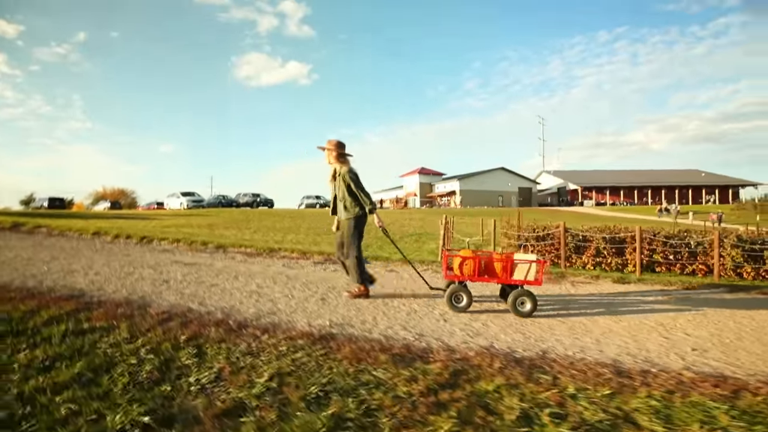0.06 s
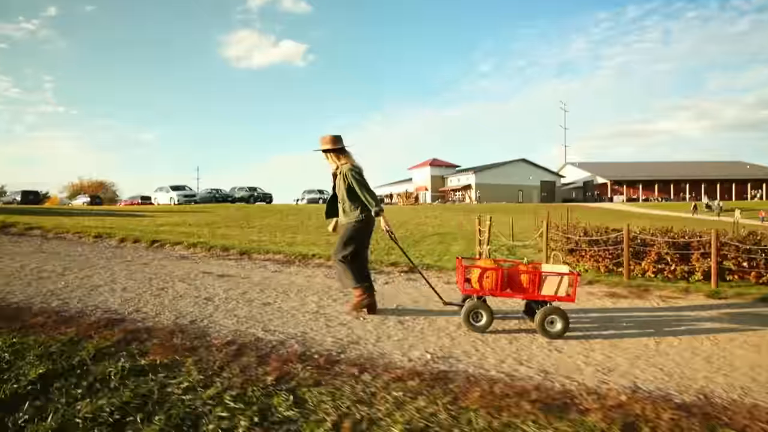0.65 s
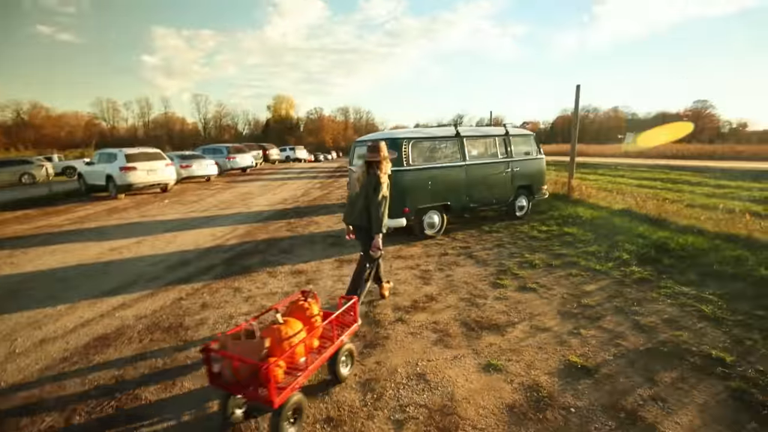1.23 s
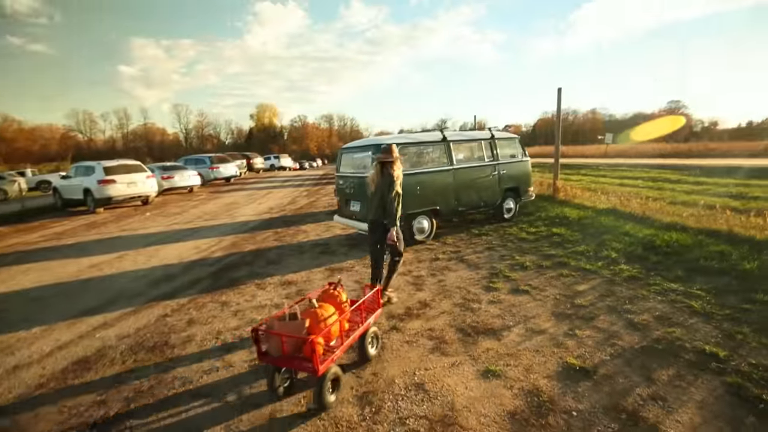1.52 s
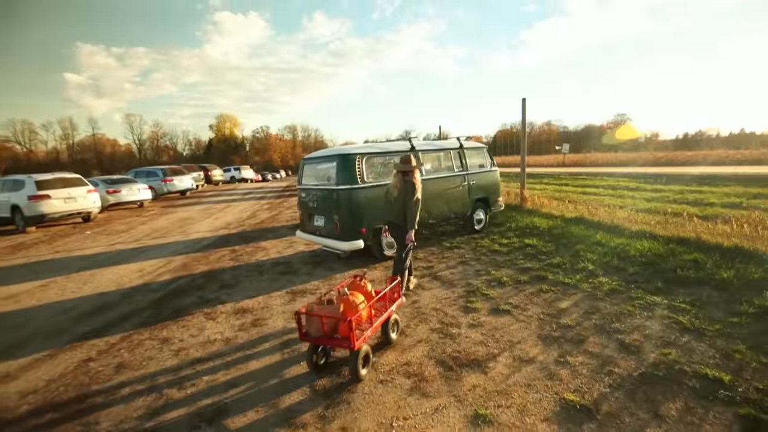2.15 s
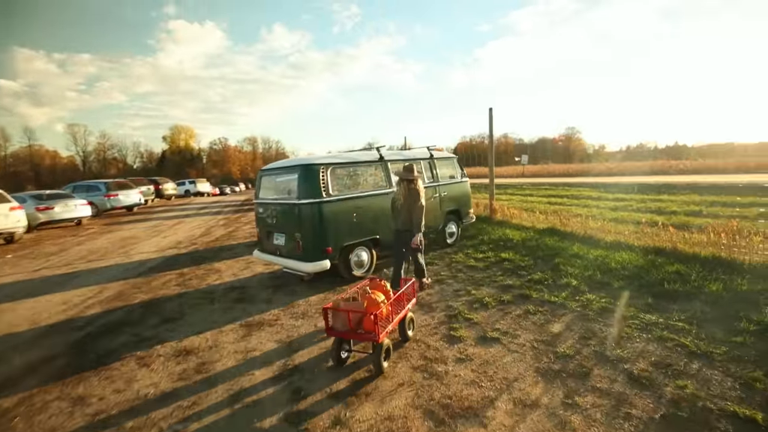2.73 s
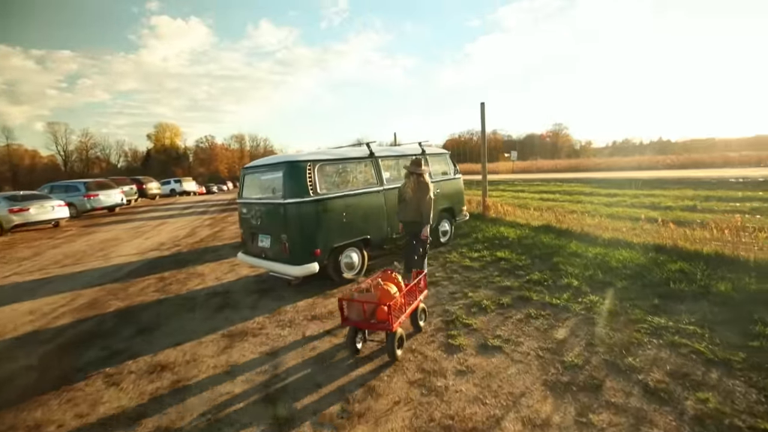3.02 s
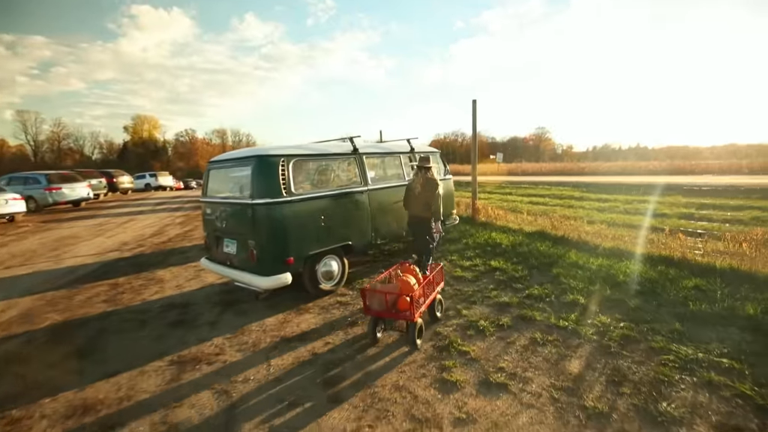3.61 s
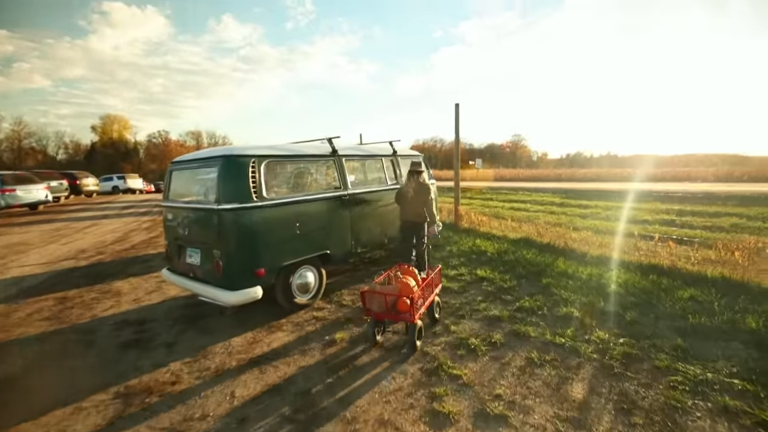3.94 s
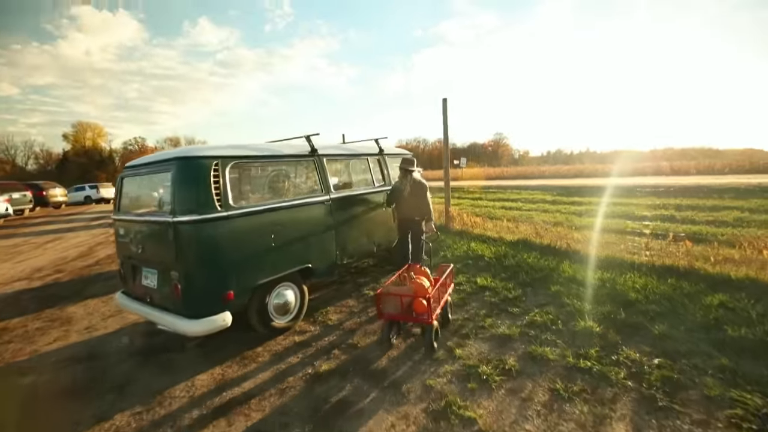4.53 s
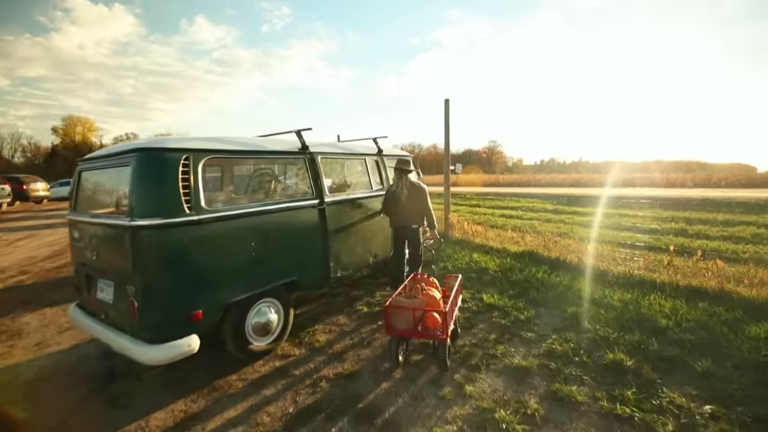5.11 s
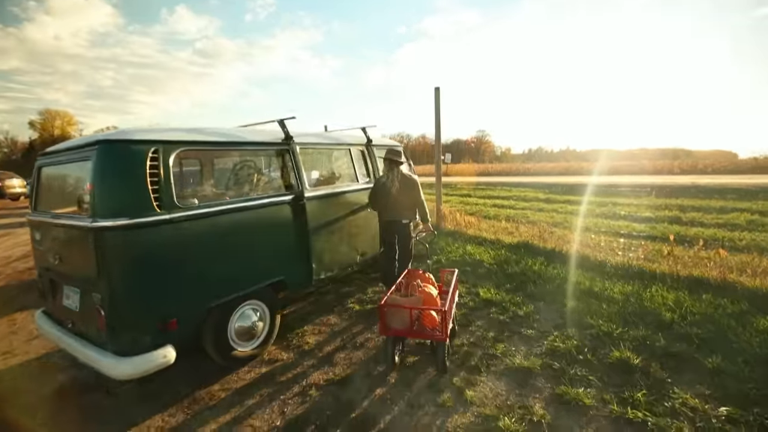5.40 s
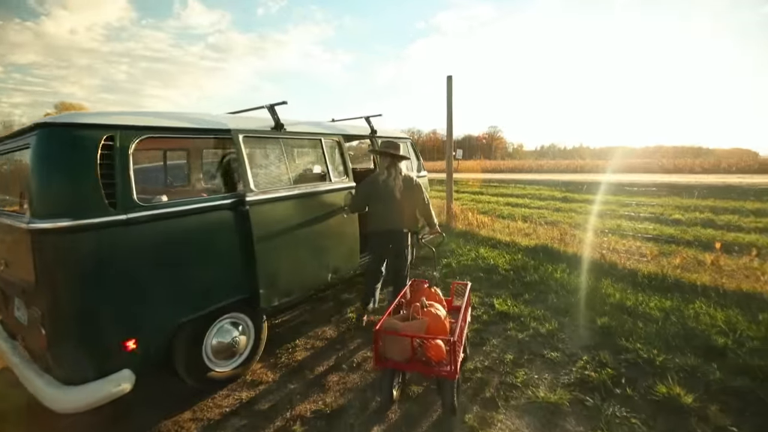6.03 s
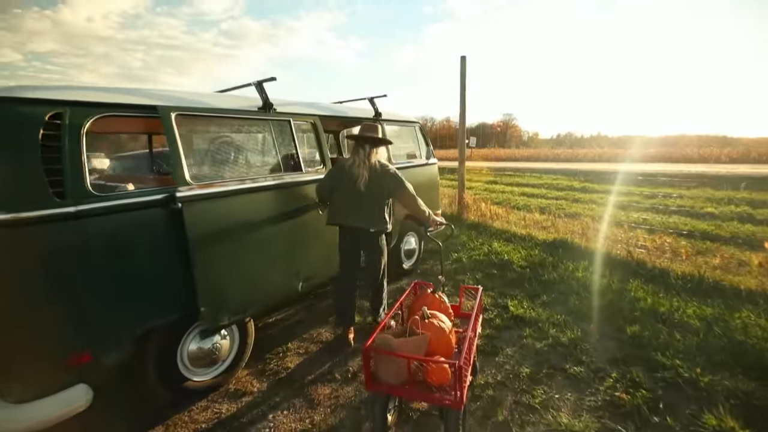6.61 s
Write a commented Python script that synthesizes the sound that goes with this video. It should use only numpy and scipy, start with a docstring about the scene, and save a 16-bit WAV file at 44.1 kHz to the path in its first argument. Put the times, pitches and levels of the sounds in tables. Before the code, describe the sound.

Gravel crunches and scuffs as a metal wagon rolls along, its mesh sides rattling brightly and its axle giving tiny squeaks. Once the wagon comes to rest, a van's door latch clicks sharply with a thud, and the sliding door rolls open with a hollow, juddering rumble. The setting is quiet open air, with a faint low hum at first and soft puffs of wind on the microphone.

```python
"""Stones crunch and pop under the tyres of a loaded steel-mesh wagon pulled over gravel outdoors.
Bumps set its cage clashing and jiggling, the steel squeaks and clinks, and the gravel is scuffed.
It rolls to a stop; a van's latch snaps and the side door rumbles down its rail, the rollers
shaking the hollow body. Underneath lie an open-air hush, a light breeze nudging the microphone
and, at the start, a faint low hum."""
import sys
import numpy as np
from scipy import signal
from scipy.fft import rfft, irfft, next_fast_len
from scipy.io import wavfile
from scipy.ndimage import map_coordinates

SR = 44100
rng = np.random.default_rng(int(sys.argv[2]) if len(sys.argv) > 2 else 0)


def persist_wave(psi):
    """Save psi, clipped to +-1, as 16-bit WAV."""
    counts = np.round(np.clip(psi, -1, 1) * 32767).astype(np.int16)
    wavfile.write(sys.argv[1], SR, np.atleast_2d(counts).T)


N = 297675
TOP_HZ = 16000

# bumps that throw the wagon's panels: start_s, level_db, edge_offset_db, rebound_offset_db
BUMPS = [(.05, -42.5, -7, -4), (.067, -41, 0, -7), (0.1467, -45.5, 7, -17), (.477, -38.5, -8, -20),
         (0.5533, -38, 2.5, 1), (0.6531, -32, 0.5, -2.5), (0.7514, -34, -16, -9), (0.8036, -33, -17, -8),
         (0.887, -40.5, -13, 5.5), (1.05, -35, -10, 0), (1.072, -35, -21, -15), (1.116, -33, -21, -30),
         (1.179, -26, -3, -4.5), (1.229, -25, -4, -35), (1.3058, -22.5, -5, -35), (1.406, -32, -13, -22),
         (1.4404, -29.5, -14, -5), (1.4872, -30, -26, -17), (1.758, -30, -24, -14),
         (1.801, -31.5, -17, -10), (1.904, -31, -1.5, -11), (1.949, -38, -12, -12), (2.0105, -29, -3.5, -5),
         (2.072, -40.5, 0, -22), (2.162, -37.5, -18, 6), (2.181, -41, -16, -12), (2.247, -43, 0, -20),
         (2.32, -32.5, -6.5, -1), (2.451, -29.5, -6, -2), (2.476, -31.5, -3, -15), (2.5117, -23, 1.5, -4.5),
         (2.6037, -35, -9, -25), (2.666, -30, -12, -16), (2.683, -24, 0.5, -35), (2.8061, -33, -15, -17),
         (2.843, -26, -3, -4), (2.904, -29, -5.5, -16), (2.942, -36.5, -21, -24), (2.984, -41.5, -24, -23),
         (3.174, -31.5, -14, -1.5), (3.3456, -22, -1.5, -33), (3.428, -33, -23, -23),
         (3.447, -32.5, -3, -19), (3.489, -29.5, -15, -6), (3.5378, -27, -15, -27),
         (3.6437, -39.5, -23, -20), (3.686, -34.5, -21, -8.5), (3.793, -39.5, -24, -12),
         (3.835, -44, -22, -1), (3.933, -38.5, -3, -22), (3.9483, -33.5, -7, -27), (4.04, -39, -27, -24),
         (4.137, -54, -20, -17), (4.1603, -42.5, -1, -33), (4.2167, -39.5, -8, -22), (4.527, -48, -19, -18)]
# tone of the clash and jiggle as heard, with a treble cut near 10 kHz: freq_hz, gain_db
CLASH_TONE = [(400, -28.5), (1500, -7.5), (2200, -3.5), (2700, 2.5), (3800, 3.5), (6000, 1.5), (8000, -1.5),
              (9400, 1), (10200, -15.5), (15800, -15.5)]
# resonances of the cage: pitch_hz, width_hz, boost_db
CAGE_MODES = [(2700, 340, 2.5), (4720, 40, -5), (5920, 140, -2.5), (6850, 75, -21), (7370, 99, 3.5),
              (7610, 140, 1.5), (8020, 640, 0.5), (8700, 220, -6), (13867, 120, -2), (14650, 80, -10)]
# broad tone of the door panel, shaken by its rollers: freq_hz, gain_db
PANEL_TONE = [(25, -32), (50, -14), (75, -18.5), (150, -11), (260, -3.5), (420, 2), (700, 0), (930, -4.5),
              (1300, -11), (2500, -28.5), (6000, -55)]
# resonances of the hollow van: pitch_hz, width_hz, boost_db
VAN_MODES = [(240.4, 7.1, 2), (293, 20, -3), (384, 5.7, 0), (481, 10, -9.5), (597, 16, -3), (687, 14, -2),
             (910, 31, -5.5)]


def amp(db):
    """Decibels to amplitude."""
    return 10 ** (np.asarray(db) / 20)


def unit(x):
    """Scale to rms 1."""
    return x / np.sqrt(np.mean(x ** 2) + 1e-20)


def curve(points):
    """Join (time_s, value) points into one value per sample."""
    return np.interp(np.arange(N) / SR, *np.transpose(points))


def swell(s, width):
    """A smooth rise and fall around s seconds, peak 1."""
    return np.exp(-((np.arange(N) / SR - s) / width) ** 2)


def wobble(rate):
    """A smooth random curve, rate knots a second."""
    knots = rng.standard_normal(int(N * rate / SR) + 4)
    return map_coordinates(knots, [np.arange(N) * rate / SR])


def add(track, s, sound):
    """Mix a sound into the track at s seconds."""
    part = track[max(round(s * SR), 0):][:len(sound)]
    part += sound[:len(part)]


def coloured(x, spectrum, modes=()):
    """Causal filter of unit power gain: a smooth spectrum with resonances standing on it."""
    size = 2 * next_fast_len(len(x) // 2 + 4096)
    hz = np.fft.rfftfreq(size, 1 / SR)
    knot_hz, knot_db = np.transpose(spectrum)
    tone = amp(np.interp(np.log(hz + 1), np.log(knot_hz), knot_db))
    peaks = sum(amp(db) ** 2 / (1 + (2 * (hz - pitch) / width) ** 2) for pitch, width, db in modes)
    gain = unit(tone * np.sqrt(1 + 2 * peaks))
    cepstrum = irfft(np.log(gain))
    cepstrum[1:size // 2] *= 2  # fold to minimum phase, so the ring follows the hit
    cepstrum[size // 2 + 1:] = 0
    return irfft(rfft(x, size) * np.exp(rfft(cepstrum)))[:len(x)]


def contacts(rate, spread_db):
    """Random tiny impacts of varying size, rate a second; rms 1."""
    size = amp(spread_db * np.clip(rng.standard_normal(N), -2, 2))
    return unit((rng.random(N) < rate / SR) * size * rng.choice([-1, 1], N))


def grains(count, t60, spread_db):
    """Small stones or wires tick at random moments, each at its own pitch; rms 1."""
    when, pitch, size = rng.random((count, 3)).T[:, :, None]
    k = np.arange(SR // 110)
    strength = amp(spread_db * np.minimum(-np.log(1 - size), 4))
    ticks = strength * np.sin(2 * np.pi * TOP_HZ * pitch * k / SR) * amp(-60 * k / SR / t60)
    positions = (when * N).astype(int) + k
    return unit(np.bincount(positions.ravel(), ticks.ravel(), N)[:N])


def ringing(x, t60):
    """The dense ring of many modes or reflections, at unit energy; it changes as the sources move."""
    t = np.arange(int(min(t60, .5) * SR)) / SR
    out, step = np.zeros(N), SR // 8
    for start in range(0, N, step):
        tail = rng.standard_normal(len(t)) * amp(-60 * t / t60)
        add(out, start / SR, signal.fftconvolve(x[start:start + step], tail / np.linalg.norm(tail)))
    return out


def chatter(t60, hold, rise):
    """Loose parts buzz against each other for a moment, then settle; times in seconds."""
    t = np.arange(SR // 6) / SR
    attack = 1 - np.exp(-t / rise)
    decay = amp(-60 * np.maximum(t - hold, 0) / t60)
    return rng.standard_normal(len(t)) * attack * decay


def rubbing(strokes, width, slips_per_s=3500):
    """Tiny catches drive a gritty band that swells and fades each stroke; width is a share of pitch."""
    out = np.zeros(N)
    for s, hz, db, length in strokes:
        n = int(length * SR)
        band = signal.butter(2, [hz / (1 + width), hz * (1 + width)], "band", fs=SR, output="sos")
        slips = rng.standard_normal(n) * (rng.random(n) < slips_per_s / SR)
        arch = np.sin(np.pi * np.arange(n) / n)
        add(out, s, amp(db) * arch * unit(signal.sosfilt(band, slips)))
    return out


def outdoors():
    """Faint open-air hush, and slow buffets of breeze on the microphone."""
    # tone of the hush: freq_hz, gain_db
    air_tone = [(15, -29), (25, -2.5), (102, -1.5), (242, -8), (427, -7), (1290, -9.5), (1560, -13),
                (2760, -14), (5730, -24.5), (8590, -24.5), (16000, -28.5)]
    # gusts: centre_s, level_db, half_length_s
    gusts = [(0.457, -40.5, 0.17), (0.944, -47, 0.14), (1.458, -50, 0.091), (3.877, -45, 0.06),
             (4.027, -36.5, 0.049)]
    buffet_tone = [(4, -22), (11, -1.5), (15, 0), (25, -24.5), (40, -25), (60, -31), (300, -78)]
    calm_db, hush_db = -59.5, -56
    breeze = amp(calm_db) + sum(amp(db) * swell(s, width) for s, db, width in gusts)
    buffet = coloured(rng.standard_normal(N), buffet_tone)
    hush = amp(hush_db) * coloured(rng.standard_normal(N), air_tone)
    return hush + breeze * buffet


def hum():
    """Faint low tones waver and fade out within the first second."""
    # tones of the hum: start_s, end_s, pitch_hz, level_db
    partials = [(0.034, 0.81, 92, -59.5), (0.026, 0.73, 196, -58.5), (0.0034, 0.74, 280, -58.5)]
    t, out = np.arange(N) / SR, np.zeros(N)
    for start, end, hz, db in partials:
        progress = np.clip((t - start) / (end - start), 0, 1)
        fade = np.sqrt(np.abs(np.sin(np.pi * progress)))
        phase = 2 * np.pi * np.cumsum(hz * (1 + 0.022 * wobble(21.3))) / SR
        out += amp(db) * fade * np.sin(phase)
    return out


def gravel_crunch(shake_db, loose_db):
    """Tyres and footfalls grind the gravel, and now and then a single stone cracks."""
    # feet bearing down: centre_s, level_db
    footfalls = [(.76, -50), (1.45, -48), (1.8, -49.5), (2.3, -45.5), (2.9, -51), (3.5, -48.5), (3.86, -55)]
    # tone of the crunch as heard: freq_hz, gain_db
    crunch_tone = [(60, -18), (200, -5), (420, -7), (650, 2), (950, -3), (1350, -1), (2500, 2.5),
                   (5000, -8.5), (9200, -19.5), (10400, -13), (15500, -13.5)]
    # tone of the crack as heard, with a treble cut near 10 kHz: freq_hz, gain_db
    crack_tone = [(600, -29), (1500, 0.5), (3500, 2.5), (8500, -1), (10500, -22), (15500, -22)]
    stones = contacts(rate=3200, spread_db=4.5) + grains(count=7000, t60=.007, spread_db=2.6)
    snaps = unit(ringing(contacts(rate=55, spread_db=4.5), t60=.003))
    foot_power = sum((amp(db) * swell(s, width=0.07)) ** 2 for s, db in footfalls)
    tread = np.sqrt(amp(shake_db + loose_db) ** 2 + foot_power)
    crunch = tread * amp(0.5 * wobble(31.2)) * coloured(stones, crunch_tone)
    cracks = amp(shake_db - 11) * coloured(snaps, crack_tone)
    return crunch + cracks


def mesh_jiggle(shake_db, loose_db):
    """The steel mesh jiggles, harder after each bump; firm ground rings its floor, gravel cushions it."""
    # tone of the floor wires: freq_hz, gain_db
    floor_tone = [(1800, -44.5), (2350, -7), (2600, 1), (2900, 2), (3300, -16), (4500, -35)]
    jiggle_offset_db, stir_offset_db, stir_t60_s = -2, -8, 0.21
    wires = grains(count=14000, t60=.012, spread_db=1.5)
    frame = ringing(contacts(rate=2000, spread_db=4), t60=.03)
    jolts_db = 1.5 * wobble(35)
    t, stir_power = np.arange(SR // 2) / SR, np.zeros(N)
    for s, db, _, _ in BUMPS:
        add(stir_power, s, amp(db + stir_offset_db - 60 * t / stir_t60_s) ** 2)
    motion = np.sqrt(amp(shake_db + jiggle_offset_db) ** 2 + stir_power)
    jiggle = motion * amp(jolts_db) * coloured(unit(wires + frame), CLASH_TONE, CAGE_MODES)
    floor_drive = amp(-39.5 + jolts_db) * (motion / motion.max()) ** 0.75
    floor_ring = floor_drive * coloured(contacts(rate=1700, spread_db=-0.5), floor_tone)
    firmness = np.clip(-loose_db / np.ptp(loose_db), 0, 1)
    return jiggle + firmness * floor_ring


def rolling():
    """The ride drives crunch and jiggle together: both dip on smooth patches and stop with the wagon."""
    # how hard the wagon shakes: time_s, level_db
    shaking = [(0, -50), (.2, -50), (.28, -51), (.36, -49.5), (.54, -43.5), (.71, -39), (1.02, -40),
               (1.4, -40), (1.72, -42), (1.85, -39), (2.25, -40.5), (2.53, -36), (2.76, -42), (2.93, -45.5),
               (3.05, -45.5), (3.36, -39.5), (3.72, -55), (4.05, -50), (4.3, -57.5), (4.7, -58)]
    # loose gravel giving way to packed dirt: time_s, crunch_offset_db
    ground = [(.4, -1), (1.0, -6), (1.2, -9), (2.8, -13.5)]
    # smooth patches between bumps: centre_s, dip_db, half_length_s
    lulls = [(0.034, -8, 0.0089), (.29, -7.5, 0.026), (0.544, -5, 0.028), (1.163, -4, 0.02),
             (1.612, -5.5, 0.022), (1.718, -9, 0.011), (1.865, -4.5, 0.018), (2.13, -5.5, 0.023),
             (2.272, -8.5, 0.026), (2.635, -1, 0.013), (2.8, -2, 0.0093), (3.024, -3.5, 0.015),
             (3.24, -5, 0.009), (3.41, -4.5, 0.012), (3.621, -4.5, 0.013), (4.126, -9, 0.014),
             (4.4, -8, 0.022), (4.48, -14, 0.016)]
    stop_s, stop_fade_s = 4.55, 0.053
    shake_db, loose_db = curve(shaking), curve(ground)
    moving = np.clip(1 - (np.arange(N) / SR - stop_s) / stop_fade_s, 0, 1)
    dips = amp(sum(db * swell(s, width) for s, db, width in lulls))
    return moving * dips * (gravel_crunch(shake_db, loose_db) + mesh_jiggle(shake_db, loose_db))


def stone_pops():
    """A stone pinched under a tyre snaps free with a few dull cycles."""
    # pinched stones: start_s, peak_db, pitch_hz
    stones = [(.015, -33, 1920), (.468, -30, 1600), (.479, -25, 1280), (1.540, -28, 4200),
              (1.555, -29, 3400), (1.579, -25.5, 4500), (1.663, -24, 2330), (1.887, -29.5, 1270),
              (2.249, -32, 1400), (2.506, -28, 1900), (3.2587, -19.5, 1300), (4.604, -33, 1710),
              (4.660, -35, 1610)]
    out, t = np.zeros(N), np.arange(SR // 20) / SR
    for s, db, hz in stones:
        age = hz * t / 0.81  # the snap swells for most of a cycle, then dies
        envelope = (age * np.exp(1 - age)) ** 2
        add(out, s, amp(db) * envelope * np.sin(2 * np.pi * hz * t))
    return out + amp(-4.5) * ringing(out, t60=0.029)


def cage_clashes():
    """A bump throws a side panel against its pins with a bright edge; it falls back once, more dully."""
    # the clash's edge as heard, with a treble dip near 11 kHz: freq_hz, gain_db
    edge_tone = [(2000, -26), (5000, 4.5), (9000, 12.5), (11000, 2), (14500, 12.5), (16000, -14)]
    rebound_s, pitch_scatter, scatter_db = 0.031, 0.018, 3
    middling_t60_s, middling_db, halving_db = 0.06, -35, 48
    steel = np.zeros(N)
    for s, db, edge_db, rebound_db in BUMPS:
        # each blow lands elsewhere and rings the cage a little differently
        modes = [(hz * (1 + rng.normal(0, pitch_scatter)), width, boost + rng.normal(0, scatter_db))
                 for hz, width, boost in CAGE_MODES]
        for at, level in [(s, db), (s + rebound_s, db + rebound_db)]:
            t60 = middling_t60_s * 2 ** ((middling_db - level) / halving_db)  # hard blows seat sooner
            blow = chatter(t60, hold=0.0018, rise=0.0013)
            add(steel, at, amp(level) * coloured(blow, CLASH_TONE, modes))
        edge = chatter(t60=0.029, hold=0.0056, rise=0.00035)
        add(steel, s, amp(db + edge_db) * coloured(edge, edge_tone, modes))
    return steel + amp(-1) * ringing(steel, t60=0.11)


def frame_groan():
    """The wagon's frame groans faintly in one narrow, low band."""
    # the groan: start_s, pitch_hz, level_db, length_s
    strokes = [(.2, 372, -51.5, 0.13)]
    return rubbing(strokes, width=0.065)


def scuffs_and_knocks():
    """Short gritty scuffs on the gravel, then a few soft knocks and a low thud."""
    # scuffs, knocks and thud: start_s, pitch_hz, level_db, length_s
    bursts = [(.45, 1360, -40.5, 0.056), (.72, 710, -48, 0.071), (.97, 1570, -43.5, 0.15),
              (2.4, 1160, -48.5, 0.1), (2.52, 1180, -42.5, 0.036), (3.22, 1080, -42.5, 0.076),
              (3.826, 775, -49, 0.041), (4.08, 760, -52, 0.015), (4.435, 260, -54.5, 0.033),
              (4.6, 1270, -49, 0.044)]
    return rubbing(bursts, width=0.41)


def squeaks_and_clinks():
    """The dry axle stutters and the steel squeaks, clinks and pings: brief tones of unsteady pitch."""
    # stutters of the dry axle: start_s, level_db
    stutters = [(1.755, -46), (1.82, -49), (1.945, -46), (2.032, -41.5), (2.098, -50), (2.198, -37.5),
                (2.472, -38), (2.547, -40), (2.605, -44), (2.637, -48), (2.761, -45), (2.803, -42.5),
                (2.888, -52), (3.211, -45), (3.288, -47), (3.522, -51.5), (3.929, -46.5)]
    # squeaks, clinks, pings and one low pitched bump: start_s, pitch_hz, level_db, length_s
    short_tones = [(0.667, 7560, -33.5, 0.0068), (0.678, 4680, -37, 0.01), (.719, 556, -39.5, 0.016),
                   (.747, 8420, -39, .009), (.978, 4720, -41, 0.013), (1.229, 3010, -34.5, 0.013),
                   (1.306, 5820, -24.5, 0.004), (1.403, 7720, -35, .009), (1.642, 8940, -29.5, 0.0035),
                   (1.902, 7840, -31, 0.0077), (2.16, 8500, -37.5, 0.0082), (2.346, 8840, -38, 0.0099),
                   (2.444, 4730, -36, .009), (3.494, 7650, -36.5, 0.0091), (3.943, 2760, -46, 0.018),
                   (1.897, 4680, -34.5, 0.0079), (2.043, 8300, -30.5, 0.011), (2.061, 7730, -31, 0.016),
                   (2.145, 4710, -35, 0.011), (2.315, 2850, -33.5, 0.013), (2.407, 4780, -38, 0.022),
                   (2.505, 7360, -27, .012), (2.739, 4670, -41, 0.0075), (2.84, 2720, -35, 0.012),
                   (2.979, 2630, -46, 0.012), (3.159, 8530, -32, 0.0085), (3.165, 8320, -33, 0.015),
                   (3.336, 4760, -38, 0.011), (4.135, 6720, -46, 0.0091), (4.525, 2830, -49, 0.02),
                   (4.736, 4870, -57, 0.033), (4.77, 8660, -42.5, 0.035)]
    axle_hz, axle_slip_s = 1833, 0.012
    out = np.zeros(N)
    waver, flutter = wobble(900), wobble(500)
    axle_slips = [(s, axle_hz * (1 + rng.normal(0, 0.012)), db, axle_slip_s) for s, db in stutters]
    for s, hz, db, length in axle_slips + short_tones:
        k = np.arange(int(length * SR))
        now = int(s * SR) + k
        phase = 2 * np.pi * np.cumsum(hz * (1 + .022 * waver[now])) / SR
        envelope = amp(1.5 * flutter[now]) * np.sin(np.pi * k / len(k))
        add(out, s, amp(db) * unit(envelope * np.sin(phase)))
    return out + ringing(out, t60=0.086)


def latch_knocks():
    """Latch and rail hardware click, and each blow thuds through the hollow door and rings its skin."""
    # hardware strikes: start_s, click_db, edge_offset_db, panel_offset_db, chatter_t60_s, part_hz
    strikes = [(4.778, -41, -5, -7, 0.14, 8700), (4.7933, -27, 2, 1, 0.12, 1380),
               (4.826, -33, -5, 1.5, 0.073, 3050), (4.8574, -24, -1, -5.5, 0.039, 3580),
               (4.998, -51.5, -14, 3.5, 0.079, 1290), (5.15, -54, -27, 8, .03, 1500),
               (5.192, -36.5, -11, -3, 0.043, 1450), (5.229, -42, -24, -9, 0.12, 3050),
               (5.272, -47, -18, 0, .04, 3600), (5.297, -41, -27, 5.5, 0.06, 2190),
               (5.312, -44, -20, 1, .04, 3300), (5.401, -24, -17, -25, 0.046, 3380),
               (5.439, -40.5, -5.5, 9.5, 0.09, 3350), (5.465, -43, -12, 10.5, 0.057, 1400),
               (5.643, -37.5, -8, -3, 0.069, 2500), (5.68, -41, -25, 12.5, 0.13, 4800),
               (6.203, -50, -22, 17.5, 0.23, 950), (6.238, -44, -9, 11, 0.11, 1800)]
    # tone of the click as heard, with a treble cut near 10 kHz: freq_hz, gain_db
    click_tone = [(500, -4), (1500, 3), (3800, 5), (6000, 3), (8700, -1.5), (10500, -11), (15500, -19)]
    # resonances of the latch: pitch_hz, width_hz, boost_db
    latch_modes = [(980, 35, 9), (1450, 60, -5), (3020, 56, 4.5), (3580, 45, -14), (3880, 54, -8),
                   (5900, 150, -10), (8750, 70, -10)]
    # the click's edge as heard, with a treble dip near 11 kHz: freq_hz, gain_db
    edge_tone = [(2000, -3), (5000, 1), (9000, 14), (11000, -3.5), (14000, 3.5), (16000, -15)]
    # tone of the struck door: freq_hz, gain_db
    thud_tone = [(25, -27), (60, -2), (130, -6.5), (230, -8), (340, 0.5), (550, 0), (1000, 2.5),
                 (1450, -0.5), (1900, -18.5), (5000, -37)]
    # ring of the sheet metal: pitch_hz, gain_db, t60_s
    skin_modes = [(344, -5, 0.15), (744, -4, 0.28), (976, 0, .09), (1280, -4.5, 0.23), (1420, -1.5, 0.18),
                  (1450, -3, .26), (1593, -17, 0.28)]
    part_width_hz, part_boost_db, skin_offset_db = 430, 5.5, -13.5
    steel, edges, panel, skin = np.zeros((4, N))
    t = np.arange(SR // 2) / SR
    for s, db, edge_db, panel_db, t60, part_hz in strikes:
        modes = latch_modes + [(part_hz, part_width_hz, part_boost_db)]
        add(steel, s, amp(db) * coloured(chatter(t60, hold=0.0039, rise=0.00043), click_tone, modes))
        add(edges, s, amp(db + edge_db) * chatter(t60=0.02, hold=0.0049, rise=0.00056))
        add(panel, s, amp(db + panel_db) * chatter(t60=0.1, hold=0.0081, rise=0.0039))
        ring = sum(amp(gain_db + rng.normal(0, 2.5) - 60 * t / decay) * np.sin(2 * np.pi * hz * t)
                   for hz, gain_db, decay in skin_modes)
        add(skin, s, amp(db + panel_db + skin_offset_db) * ring)
    click = steel + coloured(edges, edge_tone)
    thud = coloured(panel, thud_tone, VAN_MODES)
    tails = amp(-11) * ringing(click, t60=0.12) + amp(-8) * ringing(thud, t60=0.29)
    return click + thud + skin + tails


def door_thumps():
    """The door pops off its seal and lurches, swaying in low, dying tones."""
    # sways of the door: start_s, pitch_hz, level_db, t60_s
    sways = [(4.791, 50.3, -34, 0.26), (4.801, 137, -41, 0.21), (4.826, 84.5, -36, 0.092),
             (4.797, 363, -27.5, 0.065), (4.905, 216, -43, 0.19), (5.276, 45, -40, 0.17),
             (5.645, 62, -36, .12)]
    out, t = np.zeros(N), np.arange(SR // 2) / SR
    for s, hz, db, t60 in sways:
        add(out, s, amp(db - 60 * t / t60) * np.sin(2 * np.pi * hz * t))
    return out


def door_slide():
    """Rollers run over a gritty rail and shake the door; the cabin booms more as the doorway widens."""
    # rumble following the door's speed through a push, a coast and a second shove: time_s, level_db
    travel = [(5.13, -49.5), (5.26, -50), (5.35, -36.5), (5.54, -31), (5.62, -29), (5.68, -25.5),
              (5.76, -28.5), (5.95, -27), (6.12, -30), (6.17, -28.5), (6.22, -27.5), (6.47, -30.5),
              (6.66, -40.5), (6.75, -39.5)]
    # tone of the cabin: freq_hz, gain_db
    cabin_tone = [(40, -33), (90, -15), (160, -8), (260, -2.5), (470, -6.5), (700, -10), (1200, -46),
                  (3000, -59)]
    # tone of the scrape as heard: freq_hz, gain_db
    scrape_tone = [(500, -7), (1100, -3), (1700, 7.5), (2400, -7), (3500, -10), (5500, -18), (8500, -18),
                   (10500, -36), (15500, -41)]
    hiss_tone = [(2000, -5), (8500, 5), (10500, -14), (15500, -4)]
    t = np.arange(N) / SR
    rumble_db = curve(travel)
    scrape_db = -44.5 + rumble_db - rumble_db.max()
    moving = np.interp(t, [5.1, 5.16], [0, 1])
    doorway = amp(np.interp(t, [5.3, 6.0, 6.7], [-16, -5, 5]))
    judder_db = 0.9 * wobble(50)
    panel = unit(coloured(contacts(rate=1400, spread_db=2.2), PANEL_TONE, VAN_MODES))
    # reflections blur the bumps into a roar
    cabin = unit(coloured(rng.standard_normal(N), cabin_tone, VAN_MODES))
    rumble = (panel + doorway * cabin) / np.sqrt(1 + doorway ** 2)
    grit = unit(coloured(contacts(rate=1200, spread_db=2.5), scrape_tone))
    hiss = amp(-66.5) * coloured(rng.standard_normal(N), hiss_tone)
    return moving * (amp(rumble_db + judder_db) * rumble + amp(scrape_db + judder_db) * grit + hiss)


def roller_rasps():
    """The rollers rasp on dry stretches of rail."""
    # dry stretches: start_s, pitch_hz, level_db, length_s
    strokes = [(5.168, 788.4, -33.5, 0.023), (5.25, 2700, -43.5, 0.1), (5.42, 2700, -40, 0.055),
               (5.25, 167, -43, 0.067), (5.45, 149, -40, .13), (5.61, 1390, -40, 0.27)]
    return rubbing(strokes, width=0.42)


def body_booms():
    """As the rollers travel, one resonance of door and body after another swells."""
    # swelling resonances: start_s, pitch_hz, level_db, length_s
    booms = [(5.44, 964, -36, 0.2), (5.46, 386, -33.5, 0.19), (5.63, 397, -30.5, 0.21),
             (5.62, 664, -35.5, 0.2), (5.56, 1750, -42.5, 0.17), (5.70, 248, -35, 0.435),
             (5.77, 930, -32, 0.21), (5.92, 845, -36.5, 0.24), (6.14, 481, -33.5, .25),
             (6.22, 925, -36, 0.14), (6.40, 457, -37, .13)]
    return rubbing(booms, width=0.042)


def roller_judders():
    """A roller jumps and lands: its carriage rattles and the door panel answers."""
    # landings on the rail: start_s, rattle_db, panel_offset_db
    landings = [(5.523, -53, 24), (5.596, -46.5, 14), (5.622, -34, -13), (5.66, -32, 6), (5.689, -31, -3),
                (5.709, -29.5, -3), (5.729, -35, 3), (5.76, -38.5, 6), (5.80, -38, 15.5), (5.819, -44, 5),
                (5.881, -41, 4), (5.96, -45, 12), (6.157, -39, 10), (6.299, -36, 4), (6.325, -38, 8),
                (6.342, -34, -5), (6.418, -33, -1), (6.44, -45, 1), (6.547, -45, -1), (6.587, -53, 6),
                (6.70, -48.5, 6.5)]
    # tone of the rattle as heard: freq_hz, gain_db
    rattle_tone = [(600, -19), (1300, -4), (1800, -1), (2500, 0), (3200, -15), (5500, -21.5), (9000, -22.5),
                   (11000, -51)]
    # resonances of the carriage: pitch_hz, width_hz, boost_db
    carriage_modes = [(1620, 90, 8), (1800, 55, 1), (2060, 70, 1), (2350, 50, 2), (2600, 70, -6)]
    carriage, panel = np.zeros((2, N))
    for s, db, panel_db in landings:
        add(carriage, s, amp(db) * chatter(t60=0.053, hold=0.0065, rise=0.002))
        add(panel, s, amp(db + panel_db) * chatter(t60=0.077, hold=0.0076, rise=0.0018))
    rattle = coloured(carriage, rattle_tone, carriage_modes)
    return rattle + amp(-4) * ringing(rattle, t60=0.21) + coloured(panel, PANEL_TONE, VAN_MODES)


def scene():
    """The wagon, then the van door, over the outdoor bed; mono."""
    wagon = rolling() + cage_clashes() + squeaks_and_clinks() + stone_pops()
    wagon += scuffs_and_knocks() + frame_groan()
    door = latch_knocks() + door_thumps() + door_slide()
    door += roller_judders() + roller_rasps() + body_booms()
    return (wagon + door + outdoors() + hum())[None]


def record(dry):
    """A brick-wall low-pass keeps nothing above TOP_HZ."""
    size = next_fast_len(N + SR // 2)
    passband = np.fft.rfftfreq(size, 1 / SR) < TOP_HZ
    return irfft(rfft(dry, size) * passband, size)[..., :N]


dry = scene()
out = record(dry)
persist_wave(out)
```